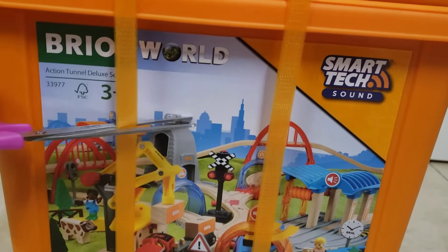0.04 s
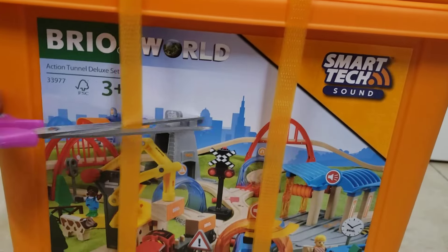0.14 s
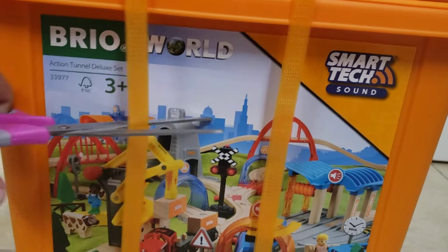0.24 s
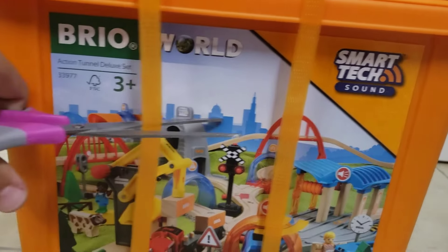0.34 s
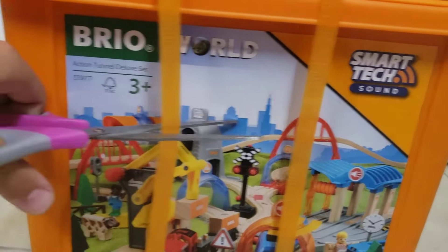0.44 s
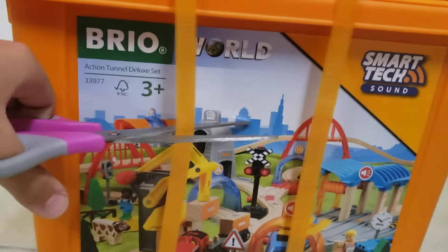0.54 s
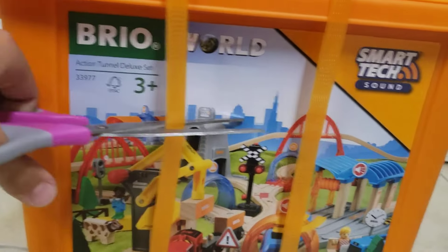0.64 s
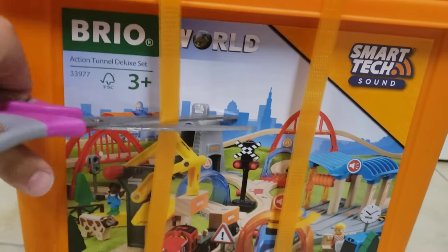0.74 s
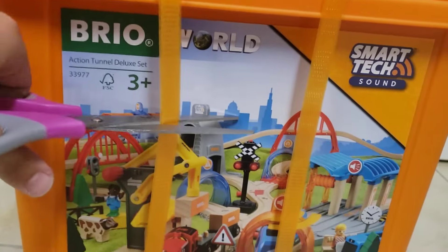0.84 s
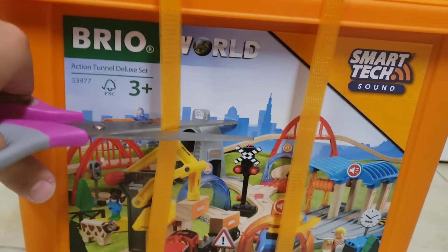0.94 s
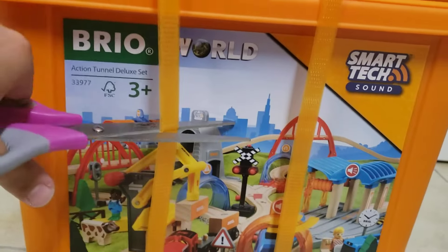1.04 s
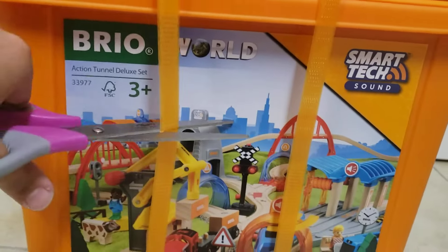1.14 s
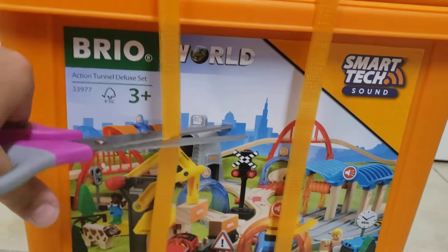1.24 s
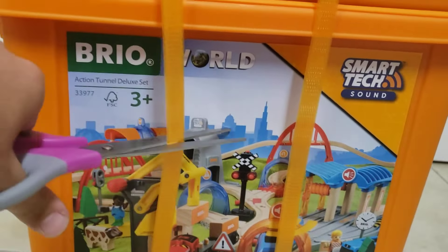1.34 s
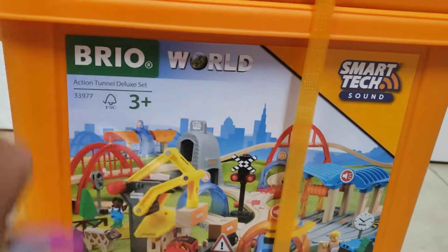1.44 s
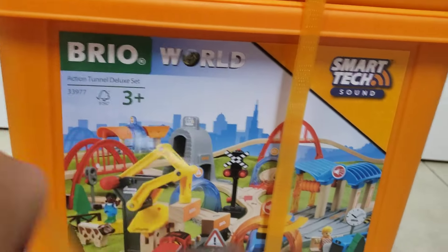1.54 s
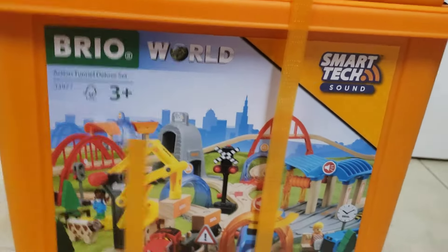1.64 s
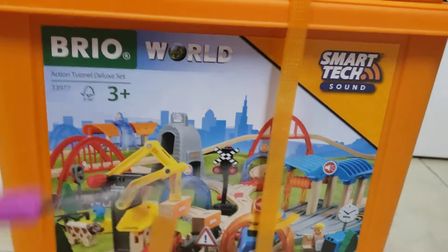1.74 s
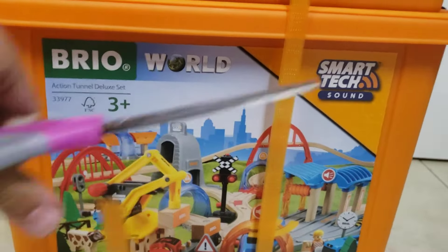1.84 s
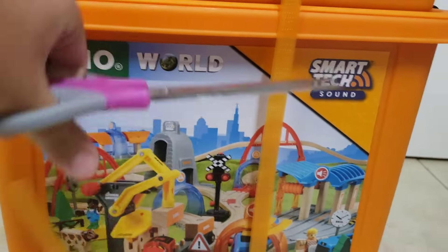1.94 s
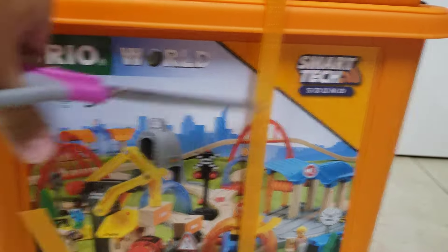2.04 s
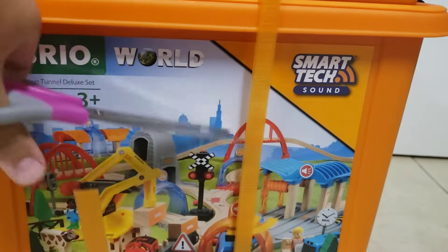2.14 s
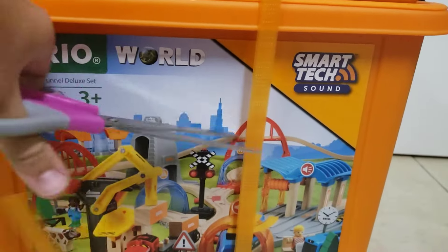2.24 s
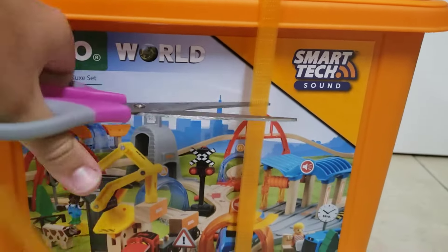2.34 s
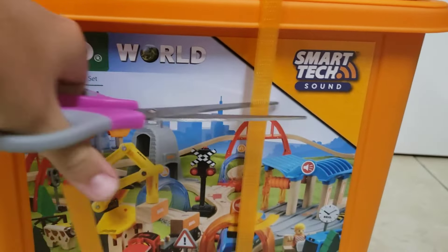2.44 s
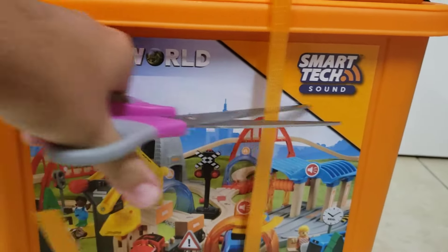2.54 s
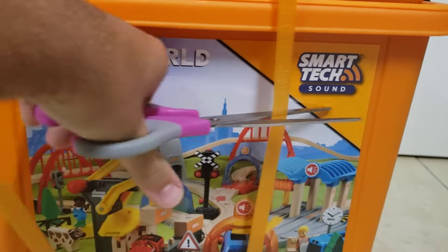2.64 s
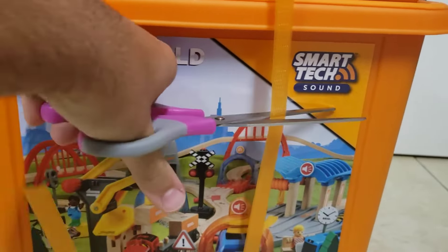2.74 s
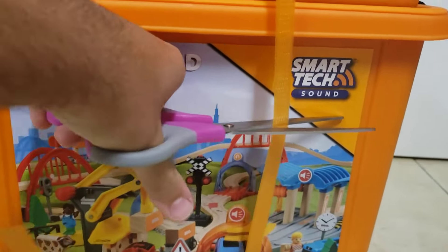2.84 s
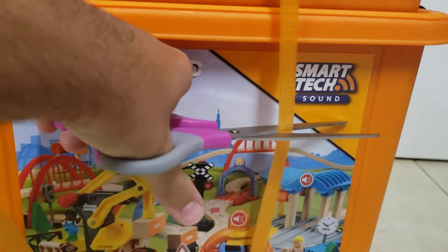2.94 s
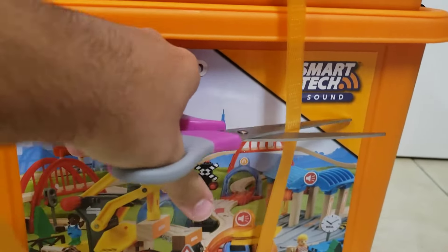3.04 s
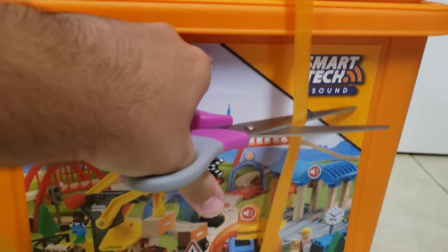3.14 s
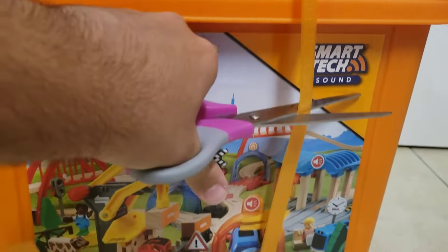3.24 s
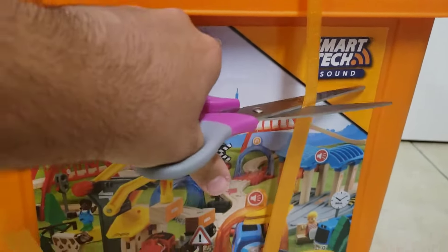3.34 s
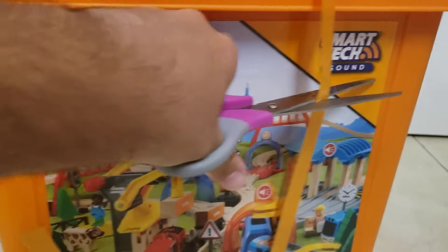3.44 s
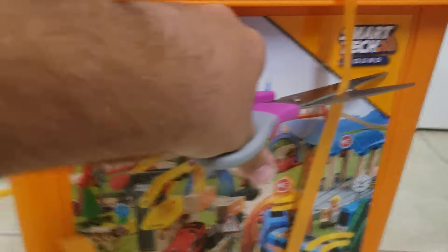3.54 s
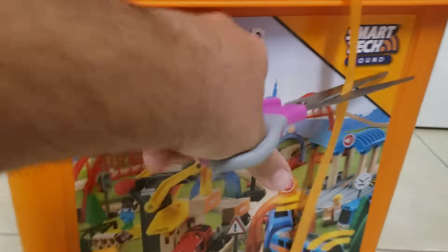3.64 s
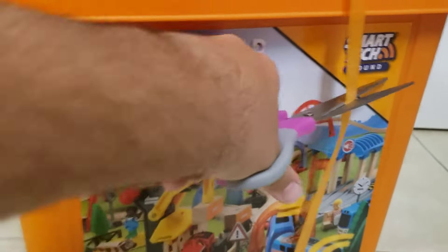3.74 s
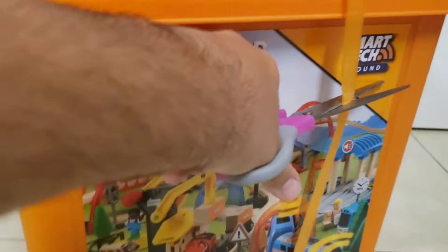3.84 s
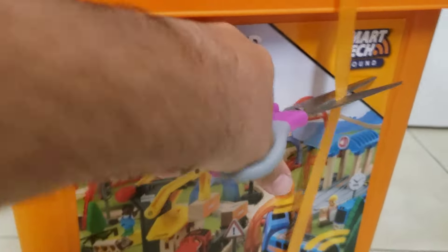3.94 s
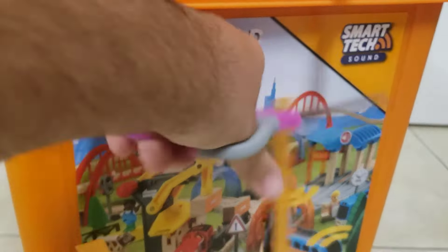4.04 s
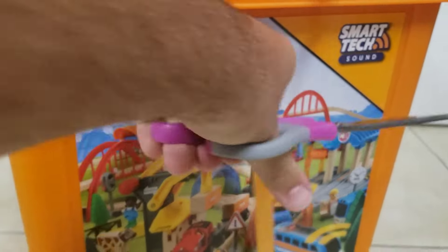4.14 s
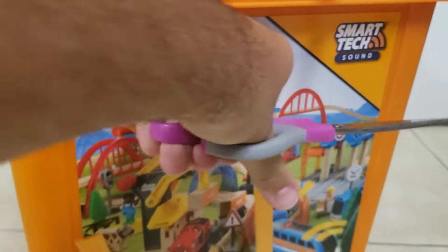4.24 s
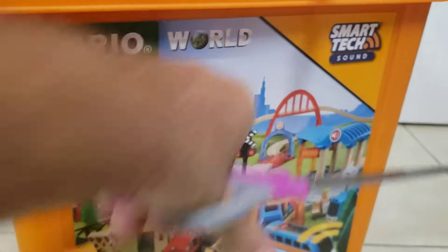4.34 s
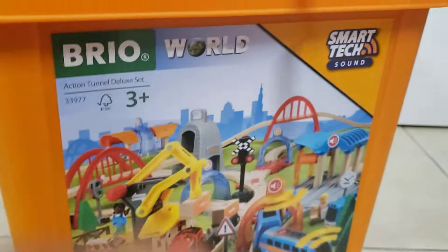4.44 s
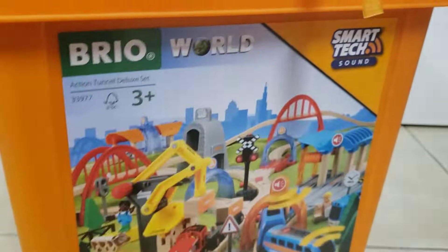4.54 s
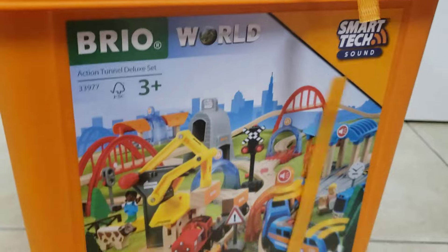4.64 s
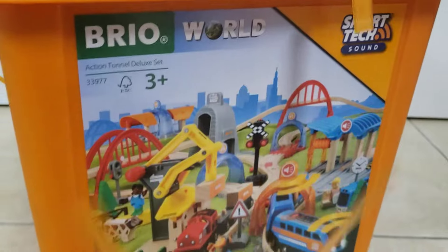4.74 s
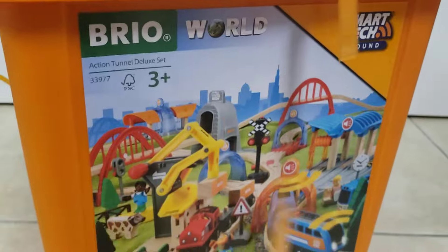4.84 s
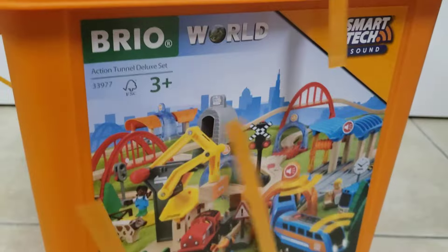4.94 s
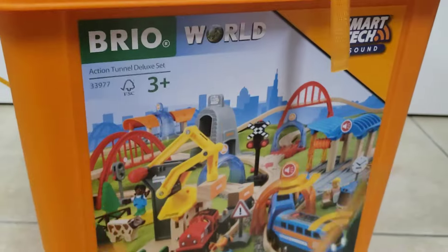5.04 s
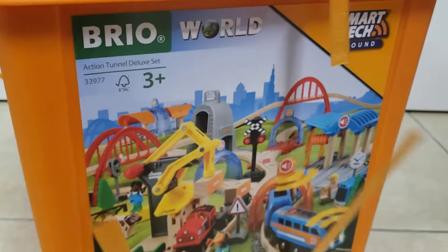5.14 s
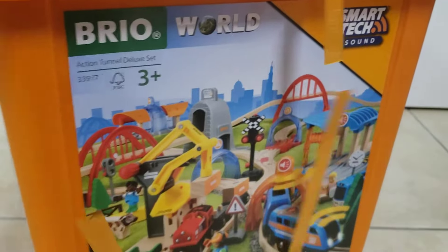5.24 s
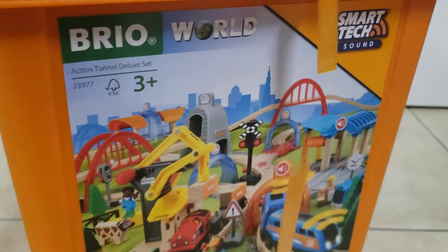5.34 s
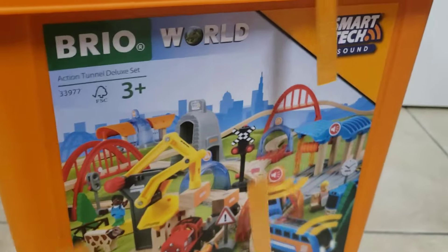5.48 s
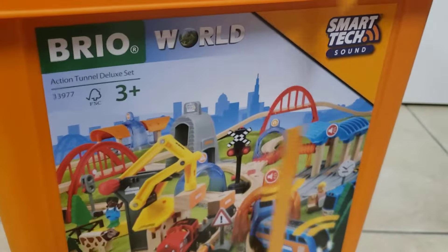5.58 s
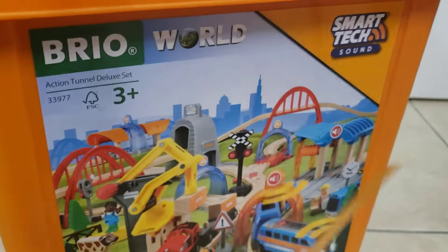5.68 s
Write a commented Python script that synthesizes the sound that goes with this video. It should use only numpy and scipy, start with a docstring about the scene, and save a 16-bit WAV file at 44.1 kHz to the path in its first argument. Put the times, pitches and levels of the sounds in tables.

```python
"""Cutting taut straps on a hollow box

Scissors cut two taut plastic packing straps on a big plastic storage box, close to a phone in a hard-floored room.
Each strap parts with a crack of filtered noise and a boom of decaying sines from the box walls.
Nibbling and knocking blades excite the same walls; hands, blades and creaking plastic are grains of noise.
Fingers thud on the phone, the loose strap slithers and ticks, and a soft hiss lies beneath."""
import sys
import numpy as np
from scipy import signal
from scipy.fft import rfft, irfft
from scipy.io import wavfile

SR = 44100
rng = np.random.default_rng(int(sys.argv[2]) if len(sys.argv) > 2 else 0)


def put_to_file(sound):
    """Save the sound as 16-bit audio at rate SR, in the file named by the first command-line argument."""
    columns = np.atleast_2d(sound).T  # one column per channel
    safe = np.clip(columns, -1, 1)
    whole_steps = np.round(safe * 32767)
    wavfile.write(sys.argv[1], SR, whole_steps.astype(np.int16))


N = 251798
TIME = np.arange(N) / SR
AGE = TIME[:SR // 3]  # seconds since a blow

# All levels in dB are relative: each source adds its own offset.
# A strap parts. Each row: start in seconds, boom level in dB, boom frequency in Hz, clack level in dB,
# crack level in dB, treble level in dB, twang level in dB, twang frequency in Hz,
# left minus right of crack and twang in dB, echo level in dB.
STRAP_SNAPS = [(1.4331, -2, 168.3, -8, 0, 1, -10.5, 1307, 3, -2),
               (4.0660, -5.5, 112.7, -2, -3, -1.5, -3, 3140, 4.5, -4.5)]
# Blades and straps knock the box. Each row: start in seconds, thump level in dB, thump frequency in Hz,
# clack level in dB.
BOX_KNOCKS = [(0.771, -32.5, 152, -58.5), (1.121, -18.5, 171.5, -36.5), (1.221, -15, 186, -29),
              (1.314, -19, 165, -33), (1.38, -26, 182, -29.5), (1.423, -30.5, 665, -24),
              (2.176, -19.5, 158, -25.5), (2.211, -25, 140, -29.5), (2.301, -34.5, 242, -42),
              (2.352, -42.5, 234, -44), (2.533, -30.5, 238, -39), (3.233, -33.5, 106.2, -45.5),
              (3.324, -21.5, 191, -38), (3.372, -20.5, 180, -32), (3.477, -21, 193, -28.5),
              (3.54, -28.5, 195, -33.5), (3.632, -24.5, 154.5, -35.5), (3.6336, -22.5, 740, -43.5),
              (3.644, -26, 123, -39), (4.0628, -27.5, 630, -29), (4.263, -32.5, 168, -51.5),
              (4.337, -34, 166, -60), (5.479, -23, 127, -47.5), (5.519, -34.5, 100, -48)]
# Blade edges and strap ends tick. Each row: start in seconds, treble level in dB, crack level in dB.
SHARP_TICKS = [(1.3572, -59, -44), (2.1774, -55, -33.5), (3.476, -51.5, -60), (3.5425, -42.5, -40),
               (3.618, -38.5, -41), (3.7905, -53, -39), (3.8304, -42, -40), (3.961, -50, -46),
               (4.2612, -36, -35), (4.339, -39, -37), (4.423, -44.5, -47), (4.5222, -46, -43),
               (4.677, -44, -41), (5.0475, -23.5, -33.5), (5.0821, -67, -33), (5.0929, -17.5, -35),
               (5.1273, -12, -24), (5.155, -11, -31), (5.1643, -15.5, -40), (5.1726, -28, -36.5),
               (5.207, -26, -42), (5.269, -41, -37), (5.2775, -15.5, -37.5), (5.3198, -25, -33),
               (5.346, -28, -76), (5.375, -31.5, -53), (5.3911, -38, -39), (5.432, -33, -52)]
# The loose strap swings across. Each row: time in seconds, left minus right of the ticks in dB.
TICK_DIRECTION = [(4.7, 2), (5.08, 7), (5.155, -1.5), (5.28, 4)]
# A loose strap slips over the box. Each row: start in seconds, length in seconds, level in dB.
STRAP_SLIPS = [(1.81, 0.065, -63.5), (4.43, 0.069, -63.5), (5.05, 0.34, -52.5), (5.16, 0.03, -36),
               (5.53, 0.2, -72)]
# Blades slide over each other. Each row: start in seconds, length in seconds, level in dB, ring in Hz.
BLADE_SWISHES = [(2.107, 0.011, -48.5, 4800), (2.336, 0.033, -60, 6060), (2.553, 0.085, -65, 4900),
                 (4.566, 0.015, -52, 5020)]
# Blades and straps scrape on creaking plastic. Each row: start in seconds, length in seconds, level in dB.
PLASTIC_GRIPS = [(1.15, 0.445, -50), (1.845, 0.028, -47.5), (2.3, 0.044, -53.5), (3.24, 0.75, -59),
                 (4.43, 0.13, -54.5)]
# A hand or blade drags over the box. Each row: start in seconds, length in seconds, level in dB.
HAND_RUBS = [(0, 0.01, -51), (.16, 0.027, -51.5), (.285, 0.037, -57), (.39, 0.34, -62.5),
             (2.55, 0.084, -56), (2.72, 0.2, -64), (3.07, 0.082, -60), (5.55, 0.11, -60)]
# Fingers bump the phone beside its right microphone. Each row: start in seconds, thump level in dB,
# thump frequency in Hz.
PHONE_BUMPS = [(1.579, -22.5, 181), (3.8281, -15, 172.7), (3.874, -27.5, 144), (3.935, -20, 112),
               (3.997, -24, 131), (5.043, -31, 122)]
# Resonances of the box walls. Each row: nominal frequency in Hz, level in dB.
BOX_MODES = [(115.8, 1), (206.4, 3.5), (235, 5), (284, 5.5), (565, -1.5), (650, -2), (830, -20),
             (945, -13.5), (1042, -5.5), (1288, -8.5), (1935, -4), (3045, -7.5)]

# Spectra of the contacts and of the background. Each row: frequency in Hz, level in dB.
CLACK_SPECTRUM = [(150, -1), (350, -3), (600, 4.5), (1150, -5), (1500, -13), (2200, -12.5), (3500, -25.5),
                  (9000, -59), (14000, -38)]
CRACK_SPECTRUM = [(200, 14), (600, 0.5), (2300, 6), (3300, 5), (4300, -2.5), (6400, -9.5), (7400, -23),
                  (8700, -66), (12000, -61)]
TREBLE_SPECTRUM = [(6000, -78.5), (8700, -34), (10000, -19.5), (11500, -7), (13000, -4), (15500, -1.5),
                   (16200, -19.5)]
SLITHER_SPECTRUM = [(500, -13.5), (1500, -12), (3100, 2.5), (4700, -2), (6400, -3), (8700, -27),
                    (11500, -4), (15300, -0.5), (16500, -22)]
RUBBING_SPECTRUM = [(110, -12), (220, 2.5), (420, -0.5), (630, 2), (1100, -10.5), (8500, -54.5)]
RUMBLE_SPECTRUM = [(25, -10), (60, 6.5), (120, 2.5), (220, 0.5), (330, -9), (1000, -53.5)]
HISS_SPECTRUM = [(25, -1), (85, -7.5), (230, -26), (1120, -25), (1650, -8.5), (2600, -21), (4000, -30),
                 (4600, -43), (8500, -62), (16500, -39.5)]
# Balance of the hiss. Each row: frequency in Hz, left minus right in dB.
HISS_BALANCE = [(900, -0.5), (1700, 15.5), (2300, 19), (3300, 6.5)]
# The room's echo. Each row: band centre in Hz, level in dB, decay by 60 dB in seconds.
ROOM_BANDS = [(59.97, -2.5, 0.48), (186, -4.5, 0.34), (500, -8.5, 1), (1070, -4, 0.75), (2830, -4.5, 0.76),
              (6100, -4, 0.77), (10990, -7.5, 0.78), (14900, -1.5, 0.16)]

WALL_DETUNE = .01  # largest fractional shift of a mode
WALL_T60_S = .17  # decay by 60 dB at damping 1
RUB_ATTACK_S, RUB_T60_S = 0.007, 0.34
SLIP_ATTACK_S, SLIP_T60_S = 0.007, 0.021
RUMBLE_DB, RUMBLE_PER_RUB_DB = -59, 3  # at rest; against the rubbing
BUMP_PAN_DB = -17  # left minus right
CREAKS_PER_S, CREAK_SPREAD_DB = 190, 6.5
CRACKLES_PER_S, CRACKLE_SPREAD_DB, CRACKLE_T60_S = 600, 6, .003
TOP_HZ = 16400


def snaps(room):
    """Sudden release of tension: a crack and a twang of the free end, then the box wall springs back and rings."""
    out, send = np.zeros((2, 2, N))
    for (s, boom_db, boom_hz, clack_db, crack_db, treble_db,
         twang_db, twang_hz, pan_db, echo_db) in STRAP_SNAPS:
        sides = pan(pan_db)
        clack = amp(clack_db - 5.5) * burst(
            CLACK_SPECTRUM, t60=0.15, tail_db=-16.5, tail_t60=0.067, spike=0.9, apart=0.15, lag=0)
        crack = amp(crack_db - 8.5) * burst(
            CRACK_SPECTRUM, t60=0.043, tail_db=-7.0, tail_t60=0.055, spike=0.35, apart=0.96, lag=.00005)
        twang = amp(twang_db) * thump(twang_hz, cycles=19.0, lead=1.4)
        treble = amp(treble_db - 16.0) * burst(
            TREBLE_SPECTRUM, t60=0.0047, tail_db=-15, tail_t60=0.06, spike=0.31, apart=0.36, lag=0.00015)
        swing = amp(boom_db + 7.0) * panel(boom_hz, cycles=5.0, overtone_db=-17.0)
        boom = swing + amp(boom_db - 22.0) * walls(soft_hz=5020, damping=0.91)
        lurch = amp(boom_db - 8.0) * thump(59.7, cycles=5.9, lead=.4)  # the whole box
        add(out, s, clack + (crack + twang) * sides + treble)
        add(out, s + 0.00066, boom)
        add(out, s, lurch * pan(1.2))

        # the first spike, with the boom, fills the room
        spike = amp(clack_db - 9.5) * click(CLACK_SPECTRUM)
        spike = spike + amp(crack_db - 3.5) * click(CRACK_SPECTRUM) * sides
        spike = spike + amp(treble_db - 10.5) * click(TREBLE_SPECTRUM)
        add(send, s, (spike + boom) * amp(echo_db))
    return out + echo(send, room)


def knocks():
    """Impact on a hollow body: a small crunch leads in a dull thump, and harder blows ring the walls more."""
    out, lead = np.zeros((2, N)), .006  # seconds of crunch before the blow
    for s, thump_db, hz, clack_db in BOX_KNOCKS:
        ring = amp((thump_db + clack_db) / 2 - 14.5) * walls(soft_hz=700, damping=1.18)
        body = amp(thump_db + 7.0) * panel(hz, cycles=6.18, overtone_db=-8.5) + ring
        clack = amp(clack_db + 5.5) * burst(
            CLACK_SPECTRUM, t60=0.014, tail_db=-25.5, tail_t60=0.064, spike=0.75, apart=0.13, lag=.00003)
        add(out, s + 0.001, body - clack * pan(15.0))
        add(out, s - lead, amp(clack_db - 7.0) * colour(bite(lead), CLACK_SPECTRUM))
    return out


def ticks():
    """Brief hard contact: too short to move the box, each tick rebounds once at a quarter of its size."""
    out = np.zeros((2, N))
    dry_contact = dict(t60=.007, tail_db=-17, tail_t60=.03, spike=1.1)
    for s, treble_db, crack_db in SHARP_TICKS:
        treble = amp(treble_db - 3.0) * burst(TREBLE_SPECTRUM, apart=0.6, lag=.00027, **dry_contact)
        crack = amp(crack_db + 2.0) * burst(CRACK_SPECTRUM, apart=1.0, lag=.00005, **dry_contact)
        direction_db = np.interp(s, *np.transpose(TICK_DIRECTION))
        tick = (treble + crack) * pan(direction_db)
        add(out, s, tick)
        add(out, s + rng.uniform(.002, .009), tick / 4)
    # thin straps and blades radiate little bass
    return signal.sosfilt(signal.butter(1, 1100, "high", fs=SR, output="sos"), out)


def slide():
    """Repeated catching: the embossed strap crackles at random moments over the box's edges, a few times sharply."""
    caught = rng.random(N) < CRACKLES_PER_S / SR
    sizes = amp(CRACKLE_SPREAD_DB * np.minimum(rng.standard_normal(N), 2))
    crackles = unit(signal.fftconvolve(caught * sizes, fade(CRACKLE_T60_S))[:N])
    rasp = colour(noise(N, apart=0.67) * crackles, SLITHER_SPECTRUM)
    return rasp * strokes(STRAP_SLIPS, SLIP_ATTACK_S, SLIP_T60_S) * pan(1.1)


def swishes():
    """Stick-slip of steel on steel: tiny slips around one broad ring, as the scissors open and close."""
    out = np.zeros((2, N))
    for s, length, db, hz in BLADE_SWISHES:
        ring = [(hz / 6, -14), (hz / 2, -3), (hz * 0.92, -7), (hz, 0), (hz / 0.97, -8), (8700, -28), (14000, -13)]
        progress = AGE / length
        stroke = 2 * progress * np.exp(1 - 2 * progress)  # peaks at half the length
        slips = noise(len(AGE), apart=1.0) * grains(rate=310, spread_db=4.0)[:len(AGE)]
        add(out, s, amp(db) * stroke * colour(slips, ring))
    return out


def creaks():
    """Irregular yielding: squeezed plastic gives way in small random crunches with the clack's spectrum."""
    crunches = noise(N, apart=0.46) * grains(rate=CREAKS_PER_S, spread_db=CREAK_SPREAD_DB)
    return colour(crunches, CLACK_SPECTRUM) * strokes(PLASTIC_GRIPS, RUB_ATTACK_S, RUB_T60_S)


def handling():
    """Dry friction: skin and blades drag on the box in uneven slips, and a low rumble swells with them."""
    drag = strokes(HAND_RUBS, RUB_ATTACK_S, RUB_T60_S)
    slips = grains(rate=110, spread_db=2.2)
    swell = np.hypot(amp(RUMBLE_DB), amp(RUMBLE_PER_RUB_DB) * drag)
    rumble = colour(noise(N, apart=0.26), RUMBLE_SPECTRUM, size=4096) * swell
    rub = colour(noise(N, apart=0.27) * slips, RUBBING_SPECTRUM) * drag
    return rumble + rub


def bumps():
    """Structure-borne sound: soft, dry thuds travel through the phone's case."""
    out = np.zeros((2, N))
    for s, db, hz in PHONE_BUMPS:
        thud = panel(hz, cycles=3.95, overtone_db=-4.0)
        add(out, s, amp(db + 6.5) * thud * pan(BUMP_PAN_DB))
    return out


def reflections():
    """Diffuse reverberation: noise builds up in a few ms and dies band by band, the bass alike on both sides."""
    t, out = TIME[:SR], 0
    bins = np.log(np.fft.rfftfreq(SR, 1 / SR) + 1)
    centres = np.log([row[0] for row in ROOM_BANDS])
    for (hz, db, t60), own in zip(ROOM_BANDS, np.eye(len(ROOM_BANDS))):
        weight = np.interp(bins, centres, own)  # overlapping bands sum to one in power
        source = noise(SR, apart=min(0.06 + hz / 900, 1))
        band = irfft(rfft(source) * np.sqrt(weight))
        decay = fade(t60, t) + 1.5 * fade(0.35, t)
        shape = decay * (1 - fade(0.016, t)) ** 2
        out = out + amp(db) * band * shape / np.linalg.norm(shape)
    return out


def echo(x, room):
    """Linear superposition: every instant of sound starts its own copy of the room's response."""
    return signal.fftconvolve(x, room, axes=1)[:, :N]


def hiss():
    """Stationary noise: a steady soft hiss whose left-right balance depends on frequency, stronger at the left."""
    both = colour(noise(N, apart=0.87), HISS_SPECTRUM, size=4096)
    tilt = np.sqrt(gains(HISS_BALANCE, N))
    sides = np.array([tilt, 1 / tilt])
    return amp(-57) * irfft(rfft(both) * sides / sides.mean(axis=0), N)


def burst(points, t60, tail_db, tail_t60, spike, apart, lag):
    """Contact noise: a spike (lag s later on the right), a crunch and a weaker rattle; energy of 1 ms at level 1."""
    decay = fade(t60) + amp(tail_db) * fade(tail_t60)
    push = noise(len(AGE), apart) * decay
    push /= np.sqrt(np.mean(np.sum(push ** 2, axis=1)))
    push[[0, 1], [0, int(lag * SR)]] += spike
    return unit(colour(push, points)) * np.sqrt(1e-3 / AGE[-1])


def click(points):
    """Impulse excitation: a single clean spike with the given spectrum and the energy of a burst."""
    impulse = np.tile(AGE == 0, (2, 1)) * np.sqrt(1e-3 * SR)
    return colour(impulse, points)


def bite(length):
    """Progressive fracture: the blades crunch into the plastic, harder and harder until it gives."""
    t = AGE[:int(length * SR)]
    pressure = np.pad(t / length, (0, len(AGE) - len(t)))
    return noise(len(AGE), apart=0.16) * pressure


def thump(hz, cycles, lead):
    """Damped oscillation: a struck part swells over lead cycles and falls by 60 dB in the given cycles."""
    turn = hz * AGE  # cycles since the blow
    swell = np.minimum(turn / max(lead, .05), 1)
    return -np.sin(2 * np.pi * turn) * swell * fade(cycles / hz)


def panel(hz, cycles, overtone_db):
    """Plate vibration: a panel's lowest swing with its next, shorter one about an octave up."""
    lowest = thump(hz, cycles, lead=0.88)
    return lowest + amp(overtone_db) * thump(2.04 * hz, cycles, lead=1.0)


def walls(soft_hz, damping):
    """Modal resonance: box modes shift a little at every blow, and a softer contact leaves out the high ones."""
    out = 0
    for nominal_hz, db in BOX_MODES:
        hz = nominal_hz * (1 + WALL_DETUNE * rng.uniform(-1, 1))
        phase = np.array([[1], [-1]]) * min(hz / 2500, .8)  # high modes reach the sides out of step
        level = amp(db) / (1 + (hz / soft_hz) ** 2)
        out = out - level * np.sin(2 * np.pi * hz * AGE + phase) * fade(WALL_T60_S / damping)
    return out * (1 - fade(0.0033)) ** 2


def strokes(rows, attack, t60):
    """Friction envelope: each drag builds up, holds while the surfaces move and dies away."""
    level = 0
    for s, length, db in rows:
        rise = np.clip((TIME - s) / attack, 0, 1)
        level = level + amp(db) * rise * fade(t60, np.maximum(TIME - s - length, 0))
    return level


def grains(rate, spread_db):
    """Stick-slip: surfaces catch and slip with random sizes, each held for 1 / rate s."""
    hold = max(int(SR / rate), 1)
    sizes = amp(spread_db * rng.standard_normal(N))
    return unit(sizes[np.arange(N) // hold])


def noise(count, apart):
    """Partial coherence: stereo noise, where apart is the size of the side against the mid."""
    mid, side = rng.standard_normal((2, count))
    return unit(np.array([mid + apart * side, mid - apart * side]))


def colour(x, points, size=1024):
    """Minimum phase: a causal filter of unit energy with the given spectrum, by way of the cepstrum."""
    cepstrum = irfft(np.log(gains(points, size)))
    cepstrum[1:size // 2] *= 2  # fold negative times onto positive ones
    cepstrum[size // 2 + 1:] = 0
    response = irfft(np.exp(rfft(cepstrum)))
    response /= np.linalg.norm(response)
    return signal.fftconvolve(x, response[None], axes=1)[:, :x.shape[1]]


def gains(points, size):
    """Frequency response: the spectrum's gain at every bin, with dB interpolated over log frequency."""
    hz, db = np.transpose(points)
    bins = np.log(np.fft.rfftfreq(size, 1 / SR) + 1)
    return amp(np.interp(bins, np.log(hz), db))


def fade(t60, t=AGE):
    """Exponential decay: the amplitude falls by 60 dB in t60 seconds."""
    return np.exp(-np.log(1000) * t / max(t60, 1e-4))


def pan(db):
    """Level difference between the ears: left and right gains for left minus right in dB."""
    return amp(np.array([[db], [-db]]) / 2)


def amp(db):
    """Logarithmic level: decibels to amplitude gain."""
    return 10 ** (np.asarray(db) / 20)


def unit(x):
    """Effective value: scale to rms 1."""
    return x / np.sqrt(np.mean(x ** 2))


def add(track, s, sound):
    """Superposition: mix a sound into the track at s seconds."""
    start = int(s * SR)
    track[:, start:start + sound.shape[1]] += sound[:, :N - start]


def scene():
    """Direct and reverberant field: all contacts, their echo and the background."""
    room = reflections()
    dull = knocks() + creaks() + swishes()
    sharp = ticks() + slide()
    reverberation = echo(amp(-4.0) * dull + amp(-1.5) * sharp, room)
    return snaps(room) + dull + sharp + reverberation + handling() + bumps() + hiss()


def record(dry):
    """Band limits and saturation: the phone thins the deep bass, rounds the highest peaks and cuts the top."""
    thin = signal.sosfilt(signal.butter(2, 42, "high", fs=SR, output="sos"), dry)
    rounded = 1.2 * np.tanh(thin / 1.2)
    return signal.sosfilt(signal.ellip(8, .2, 70, TOP_HZ, fs=SR, output="sos"), rounded)


dry = scene()
out = record(dry)
put_to_file(out)
```